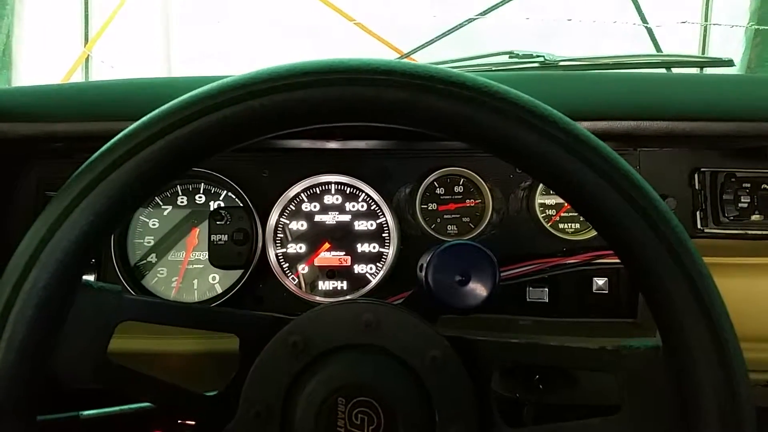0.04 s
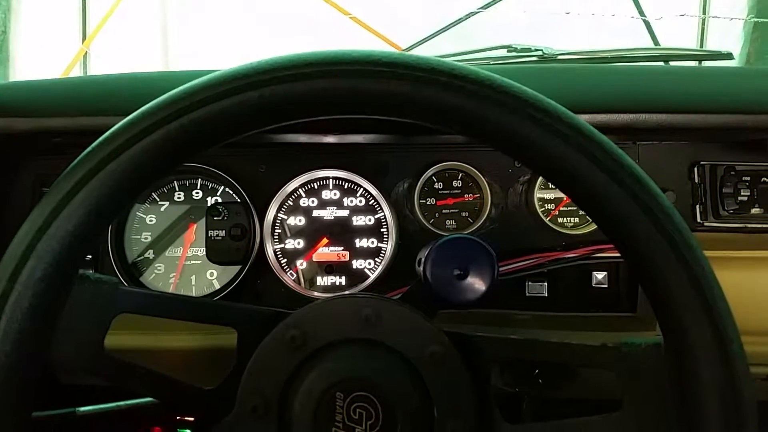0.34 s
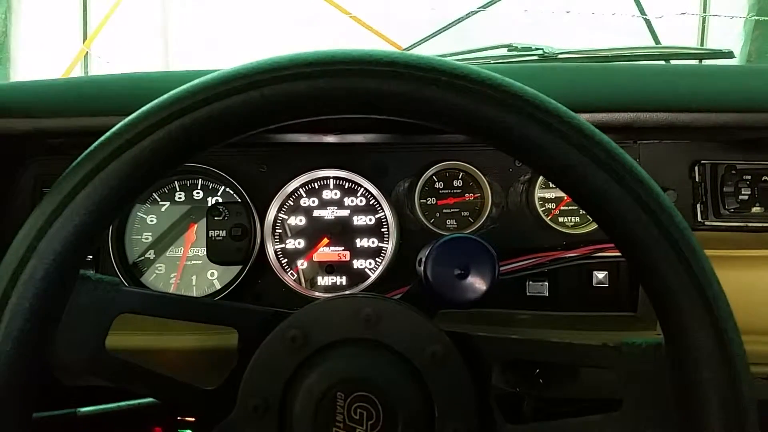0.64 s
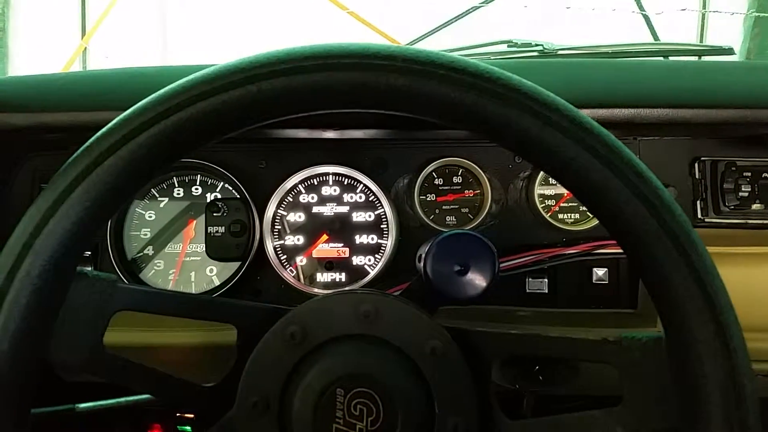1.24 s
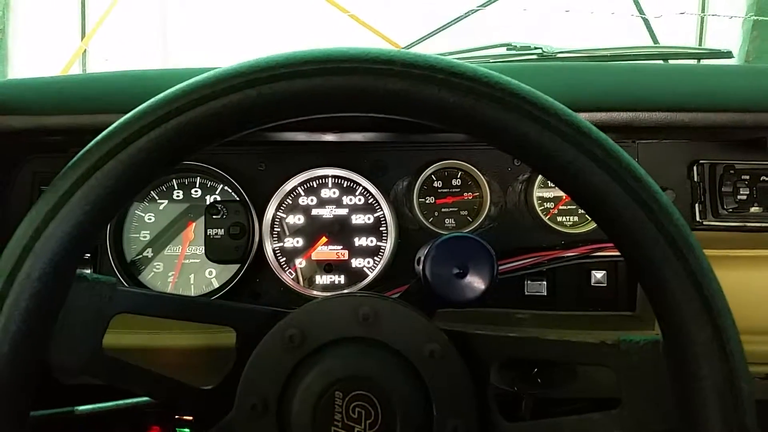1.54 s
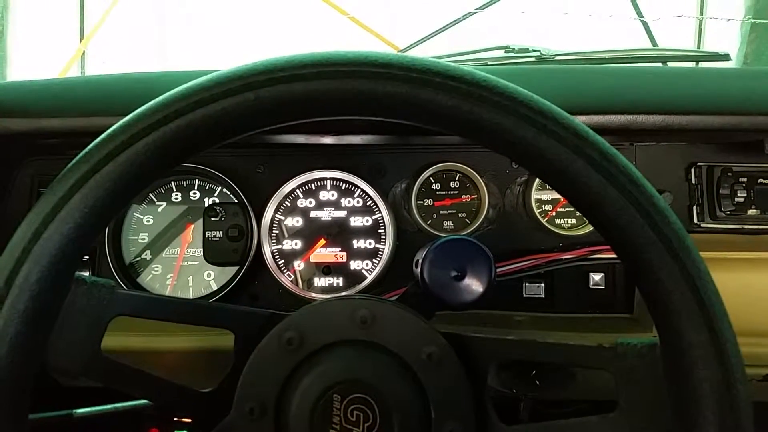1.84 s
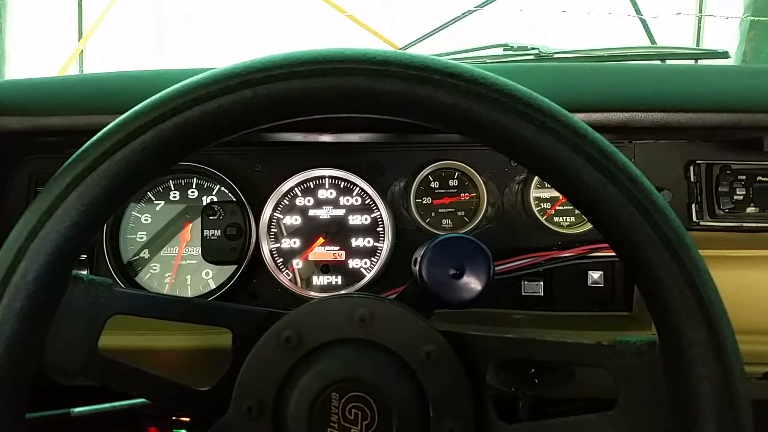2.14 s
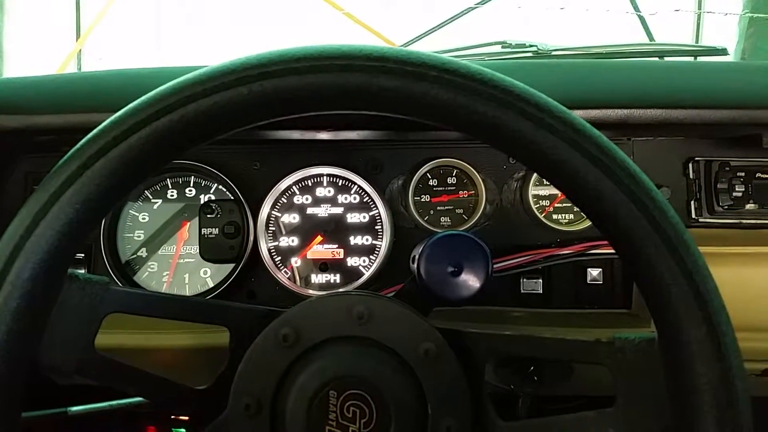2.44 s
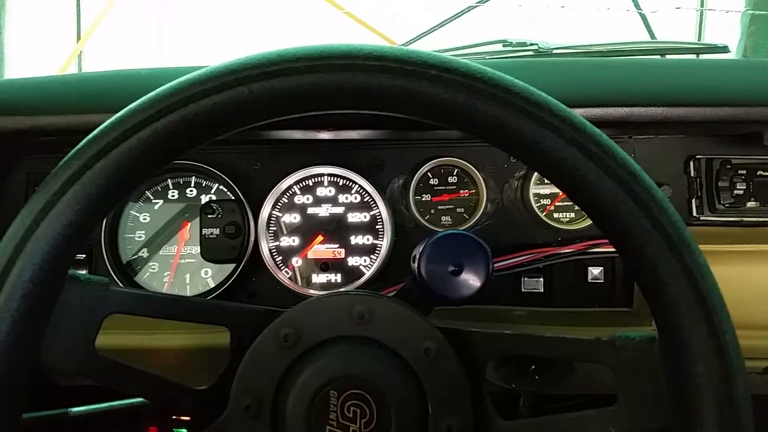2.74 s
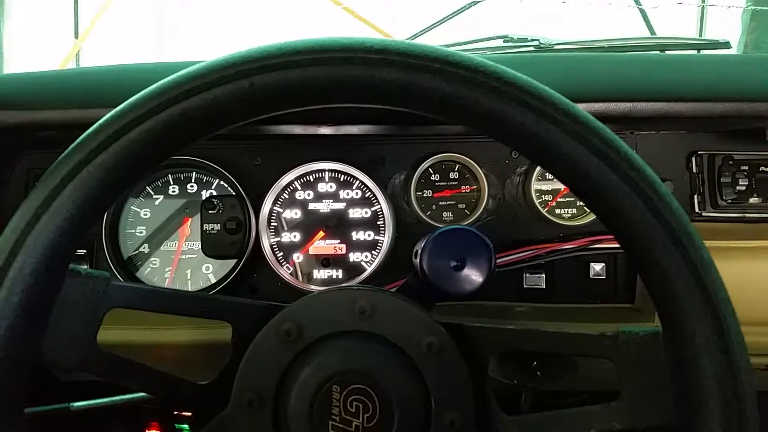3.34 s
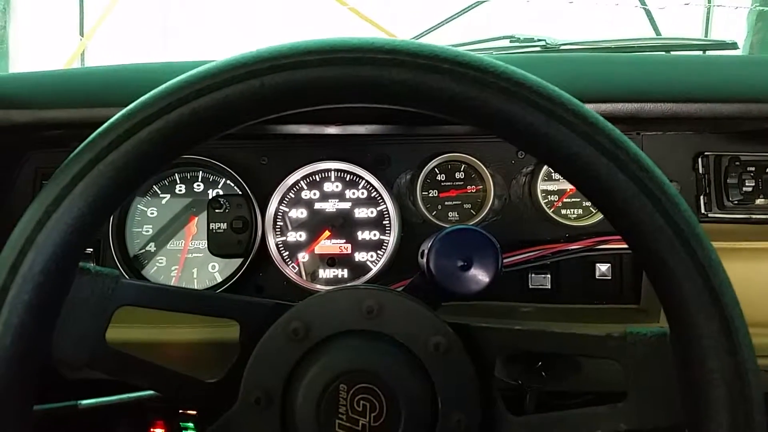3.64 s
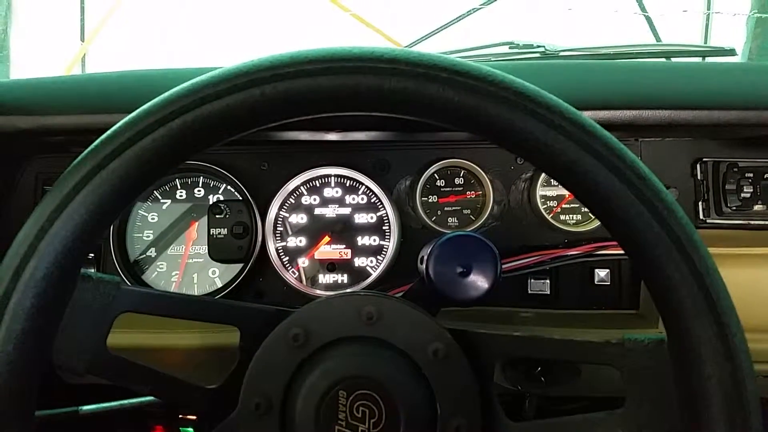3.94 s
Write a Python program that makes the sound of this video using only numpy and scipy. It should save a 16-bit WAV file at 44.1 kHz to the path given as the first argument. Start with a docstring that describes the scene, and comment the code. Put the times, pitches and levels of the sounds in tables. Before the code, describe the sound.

A V8 car engine idles for all four seconds, heard from the driver's seat as a deep, loping rumble with a steady hum. Faint metallic valve ticking and a soft, fluttering hiss lie underneath. The deepest bass surges briefly around 0.5, 3.1 and 3.8 seconds. Tiny dry rattles pass on the left near 0.9, 2.7 and 3.2 seconds. The idle sags very slightly toward the end.

```python
"""V8 idle from the driver's seat

The exhaust booms in the cabin at its engine orders, while uneven firings force the cabin's resonances
into a loping rumble whose deepest part surges now and then. A fan and a steady hum add tones, closing
valves ring metal, and air hisses faintly under a fluttering high sizzle. Three faint rattles pass,
and a limiter holds the peaks."""
import sys
import numpy as np
from scipy import signal
from scipy.fft import rfft, irfft
from scipy.io import wavfile
from scipy.ndimage import uniform_filter1d, minimum_filter1d

SR = 44100
rng = np.random.default_rng(int(sys.argv[2]) if len(sys.argv) > 2 else 0)


def wav_record(signal):
    """Record a signal, one row per channel, as 16-bit PCM in the file named by sys.argv[1]."""
    frames = np.transpose(np.atleast_2d(signal))
    bounded = np.clip(frames, -1, 1)
    # unit amplitude maps onto the largest positive 16-bit level
    quanta = np.round(bounded * 32767).astype(np.int16)
    wavfile.write(sys.argv[1], SR, quanta)


N = 176400
TIME, FREQS = np.arange(N) / SR, np.fft.rfftfreq(N, 1 / SR)
CYLINDERS = 8


def amp(db):
    """Amplitude ratio of a level: a factor of ten per 20 dB."""
    return 10 ** (np.asarray(db) / 20)


def unit(x):
    """Normalisation to an rms of one."""
    return x / np.sqrt(np.mean(x ** 2) + 1e-20)


def curve(table, column=1):
    """A spectrum interpolated from a table on a logarithmic frequency axis."""
    table = np.array(table, float)
    return np.interp(np.log(FREQS + 1), np.log(table[:, 0]), table[:, column])


def swell(table):
    """A level envelope, in dB about its mean."""
    db = np.interp(TIME, *np.transpose(table))
    return db - db.mean()


def drift(hz):
    """Random modulation: low-passed noise of unit rms."""
    return unit(irfft(rfft(rng.standard_normal(N)) / (1 + (FREQS / hz) ** 4), N))


def strokes(turns):
    """Four-stroke cycle: the sample indices of one event per cylinder in every two turns."""
    return np.flatnonzero(np.diff(np.floor(turns * CYLINDERS / 2)))


def bursts(clicks, decay_s):
    """Each impulse starts a burst of noise that decays exponentially."""
    envelope = signal.lfilter([1], [1, -np.exp(-1 / (decay_s * SR))], clicks)
    return envelope * rng.standard_normal(N)


def tones(cycles, table, waver):
    """Partials at multiples of a base rate, each with random amplitude modulation."""
    total = np.zeros(N)
    for multiple, db in table:
        envelope = np.sqrt(2) * amp(db) * (1 + waver * drift(2.6))
        total += envelope * np.cos(2 * np.pi * (multiple * cycles + rng.random()))
    return total


def pair(left, other, coherence, delay_s=.00044):
    """Partial coherence: the right spectrum mixes the delayed left with an independent one."""
    delayed = left * np.exp(-2j * np.pi * FREQS * delay_s)
    return np.array([left, coherence * delayed + np.sqrt(1 - coherence ** 2) * other])


def exhaust_drone(turns):
    """A source that repeats every two turns has harmonics at half and whole engine orders."""
    # exhaust partials in the cabin (order [multiple of crank speed], level [dB])
    orders = [(3, -31.5), (3.5, -27.5), (4, -28), (5, -26), (6, -23), (7, -31), (8, -21), (8.5, -37),
              (9, -14.5), (10, -25), (11, -30.5), (11.5, -25.5), (12, -22), (12.5, -47), (14, -27.5),
              (16, -41), (17, -39.5), (18, -41), (20, -38.5), (22, -34), (23, -31), (25, -60)]
    # strength of the drone (time [s], relative level [dB])
    effort = [(0, -8.5), (.9, -9), (2.4, -8.5), (4, -11.5)]
    return amp(swell(effort)) * tones(turns, orders, waver=.26)


def firing_rumble(turns, spread=.3, jitter_s=.0007):
    """Forced response: uneven firings, their puffs and steady gas flow excite the cabin's resonances."""
    # cabin response (frequency [Hz], relative gain [dB])
    response = [(25, -52.5), (35, -31.5), (46, -35), (62, -36.5), (95, -44), (115, -36.5), (160, -37.5),
                (185, -46), (225, -43.5), (265, -55), (310, -51), (345, -58.5), (410, -55.5), (460, -66),
                (900, -89)]
    firings = strokes(turns)
    strength, lateness = rng.standard_normal((len(firings), 2)).T
    jittered = np.clip(firings + (lateness * jitter_s * SR).astype(int), 0, N - 1)
    even, uneven = np.zeros(N), np.zeros(N)
    even[firings] = 1
    uneven[jittered] = 1 + spread * strength
    puffs = .081 * bursts(even, decay_s=.022)
    flow = .046 * rng.standard_normal(N)
    drive = uneven - even + puffs + flow  # the drone carries the periodic part
    # the Hilbert transform gives minimum phase, so ringing follows each thump
    log_gain = np.log(amp(curve(response)))
    mirrored = np.r_[log_gain, log_gain[-2:0:-1]]
    minimum_phase = np.exp(np.conj(signal.hilbert(mirrored)))[:len(log_gain)]
    return amp(-16) * unit(irfft(rfft(drive) * minimum_phase, N))


def fan(turns):
    """Rotational tone: a belt locks the fan's pitch to the crank speed."""
    # fan tone (order [multiple of crank speed], level [dB])
    orders = [(15.12, -24.5)]
    return tones(turns, orders, waver=.16)


def hum():
    """Two close tones of constant pitch beat, probably from an electric pump or blower."""
    # hum tones (frequency [Hz], level [dB])
    partials = [(463, -48), (490.5, -48)]
    return tones(TIME, partials, waver=.32)


def cabin(bass, lead_s=.00031, cutoff_hz=33, fade_s=.006):
    """Interaural time and level differences: the bass, high-passed, reaches the left side first."""
    # balance of the bass (frequency [Hz], left minus right [dB])
    balance = [(60, -1.8), (95, -.5), (140, 0), (210, .8), (330, 2.8)]
    half = amp(curve(balance) / 2) * np.exp(1j * np.pi * FREQS * lead_s)  # half to each side
    heard = signal.sosfilt(signal.butter(4, cutoff_hz, "high", fs=SR, output="sos"), bass)
    soft_ends = signal.windows.tukey(N, 2 * fade_s * SR / N)
    return irfft(rfft(heard * soft_ends) * np.array([half, 1 / half]), N)


def valves(turns, spread_db=1, decay_s=.0063):
    """Impact excitation: closing valves ring the modes of the metal behind the bulkhead."""
    # valve gear modes (frequency [Hz], bandwidth [Hz], relative level [dB])
    modes = [(830, 36, 2), (1050, 80, -3), (1510, 120, -8), (2220, 18, 6), (2415, 34, 1), (3315, 54, -8),
             (3820, 120, -10)]
    closings = strokes(turns)
    clicks = np.zeros(N)
    clicks[closings] = amp(spread_db * rng.standard_normal(len(closings)))
    metal = sum(amp(db) / (1 + 2j * (FREQS - hz) / width) for hz, width, db in modes)
    ticks = pair(rfft(bursts(clicks, decay_s)), rfft(bursts(clicks, decay_s)), coherence=.5)
    rasp = amp(-39.5 + 1.5 * drift(hz=20))  # swells and ebbs
    pan = amp([[0], [-3]])
    return rasp * pan * unit(irfft(ticks * metal, N))


def hiss(turns, cutoff_hz=375, sizzle_hz=8000):
    """Modulated broadband noise: air hisses, duller on the right, while its top throbs and flutters."""
    # hiss spectrum (frequency [Hz], relative level left [dB], relative level right [dB])
    spectrum = [(494, -59, -65), (695, -64, -62), (890, -61, -78.5), (1020, -66.5, -61), (1215, -68, -78),
                (1460, -69, -68), (1760, -70.5, -71), (2490, -70, -72), (2660, -73, -75.5),
                (3200, -70.5, -77), (3900, -71, -83.5), (4800, -73, -131), (5740, -71, -143),
                (7360, -76, -114), (9020, -74.5, -85), (10450, -68.5, -75), (12500, -68.5, -68),
                (17000, -72.5, -75.5)]
    # likeness of left and right (frequency [Hz], coherence [0-1])
    coherence = [(500, 0.38), (1100, 0.25), (2500, 0.37), (5000, 0.14), (14000, 0.15)]
    # throb at even steps through one two-turn engine cycle (relative level [dB])
    cycle = [-1.7, 0.045, -1.4, 0.063, 1, 0.27, 1.2, -0.51, -0.88, 0.72, 0.57, 1.7, -0.37, -0.97, 0.86,
             -0.7]
    # envelope of the sizzle (time [s], relative level [dB])
    treble = [(0.0, -37.5), (0.08, -31.5), (0.15, -38), (0.22, -33), (0.28, -41), (0.31, -34.5),
              (0.5, -38.5), (0.51, -35.5), (0.72, -35.5), (0.77, -37), (0.82, -33.5), (0.86, -38.5),
              (0.92, -32), (0.95, -36), (1.9, -33.5), (1.93, -31), (2.08, -39), (2.09, -36), (2.26, -33),
              (2.31, -40), (2.41, -33), (2.51, -38), (2.53, -31.5), (2.58, -39), (2.65, -33), (2.71, -38),
              (2.91, -35.5), (2.93, -39), (3.06, -36), (3.58, -37.5), (3.6, -41.5), (3.79, -31),
              (3.81, -40), (3.93, -32), (3.97, -39), (4.0, -37)]
    high_pass = 1 - 1 / (1 + (FREQS / cutoff_hz) ** 4)
    colour = amp([curve(spectrum, column=1), curve(spectrum, column=2)]) * high_pass
    air = pair(*rfft(rng.standard_normal((2, N))), curve(coherence)) * colour
    throb_db = np.interp(turns / 2, np.arange(len(cycle)) / len(cycle), cycle, period=1)
    flutter_db = 1.25 * drift(hz=32)
    swing_db = throb_db + swell(treble) + flutter_db
    low_pass = 1 / (1 + (FREQS / sizzle_hz) ** 4)
    body = irfft(air * low_pass, N) * amp(.3 * swing_db)
    sizzle = irfft(air * (1 - low_pass), N) * amp(swing_db)
    return amp(-28.5) * unit(body + sizzle)


def surging(rumble, below_hz=72, width_s=.05):
    """Amplitude modulation of the lowest band: now and then the deep rumble heaves."""
    # surges of the rumble (time [s], peak gain [dB])
    surges = [(.46, 10), (1.17, 1), (2.12, 0), (3.13, 12), (3.78, 9)]
    deep = signal.sosfiltfilt(signal.butter(2, below_hz, fs=SR, output="sos"), rumble)
    gain_db = sum(db * np.exp(-((TIME - at) / width_s) ** 2) for at, db in surges)
    return rumble + deep * (amp(gain_db) - 1)


def rattles(width_s=.02, centre_hz=4600, half_band_hz=1100):
    """Band noise in Gaussian envelopes: dry shivers mostly on the left, probably of loose trim."""
    # rattles (time [s], level on the left [dB])
    shivers = [(.93, -38), (2.65, -51), (3.22, -34)]
    envelope = sum(amp(db) * np.exp(-((TIME - at) / width_s) ** 2) for at, db in shivers)
    band = 1 / (1 + ((FREQS - centre_hz) / half_band_hz) ** 4)
    grit = irfft(rfft(rng.standard_normal((2, N))) * band, N)
    pan = amp([[0], [-12]])
    return envelope * pan * unit(grit)


def scene():
    """Superposition of the sources; one crank angle times exhaust, fan, valves and the hiss's throb."""
    # idle speed (time [s], crank speed [rev/min])
    idle = [(0, 832), (.25, 838), (.6, 830), (1, 833), (1.5, 840), (2, 832), (2.7, 829), (3, 833),
            (3.5, 819), (4, 803)]
    lope = 1 + .003 * drift(hz=5)
    rpm = np.interp(TIME, *np.transpose(idle)) * lope
    turns = np.cumsum(rpm) / 60 / SR
    machinery = fan(turns) + hum()
    bass = exhaust_drone(turns) + surging(firing_rumble(turns)) + machinery
    return cabin(bass) + valves(turns) + hiss(turns) + rattles()


def record(dry):
    """Dynamic compression: a quick limiter ducks the strongest thumps; a low-pass limits the band."""
    threshold_db, slope, makeup_db = -4.5, .57, .61
    hold_s, smooth_s, edge_hz = .012, .014, 16050
    peak = -minimum_filter1d(-abs(dry).max(0), int(hold_s * SR))
    over_db = np.maximum(20 * np.log10(peak + 1e-9) - threshold_db, 0)
    duck_db = slope * uniform_filter1d(over_db, int(smooth_s * SR))
    held = dry * amp(makeup_db - duck_db)
    low_pass = signal.firwin(1023, edge_hz, window=("kaiser", 9), fs=SR)
    return signal.oaconvolve(held, low_pass[None], "same")


dry = scene()
out = record(dry)
wav_record(out)
```